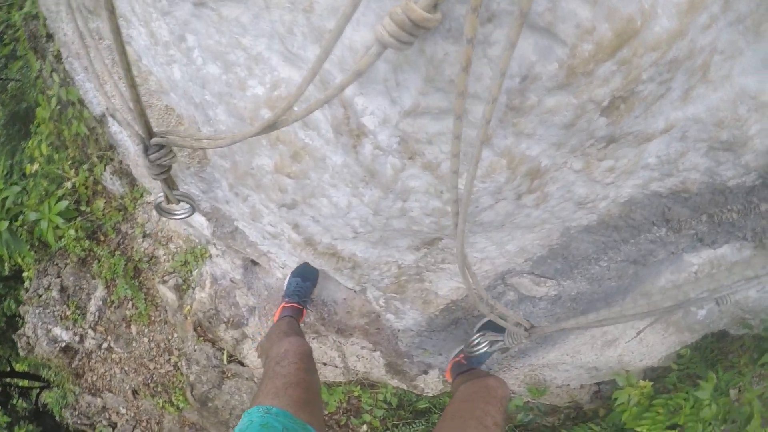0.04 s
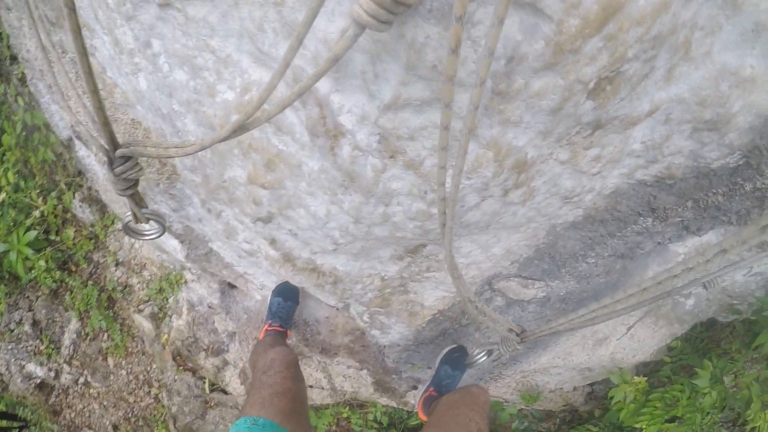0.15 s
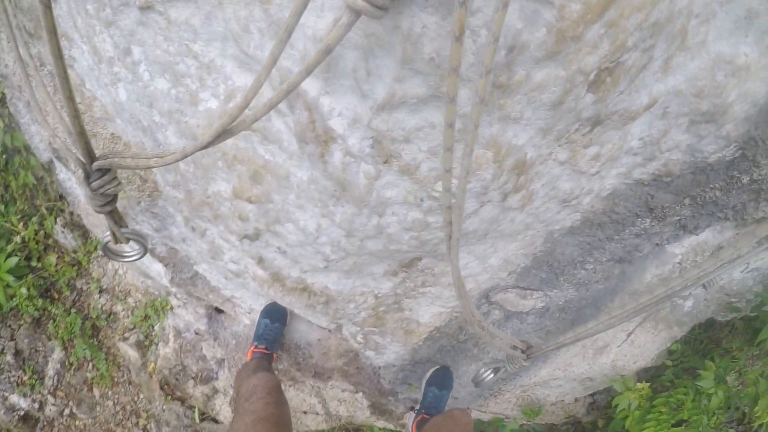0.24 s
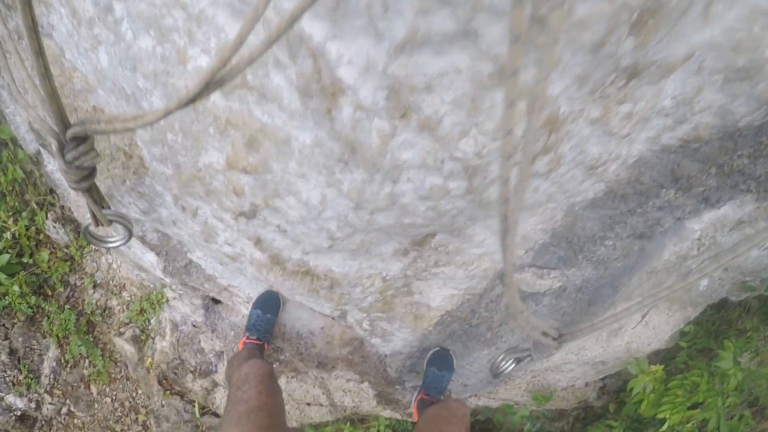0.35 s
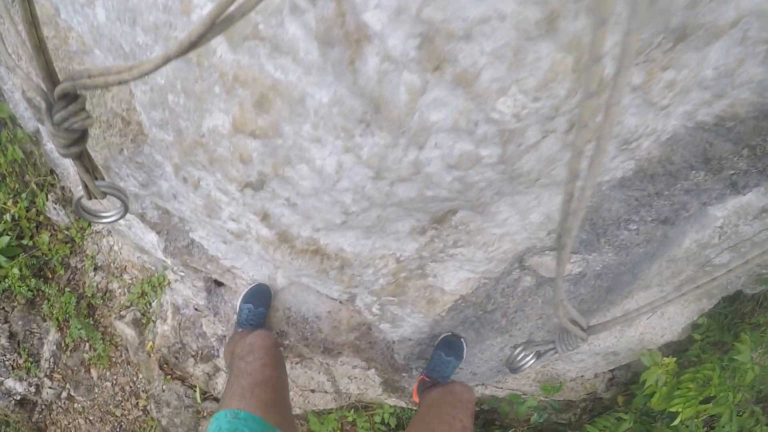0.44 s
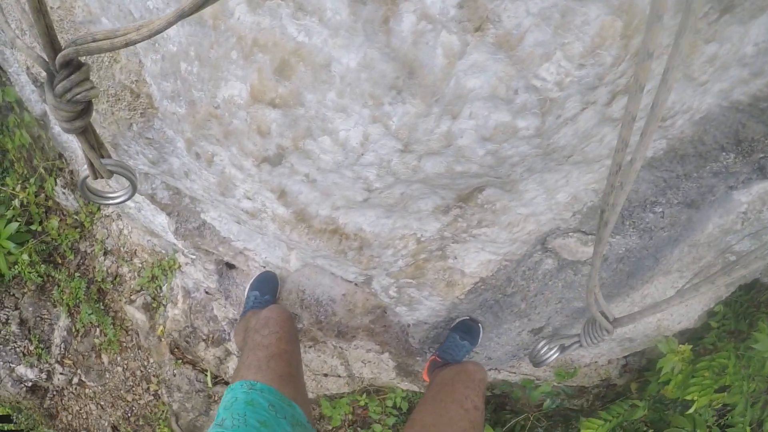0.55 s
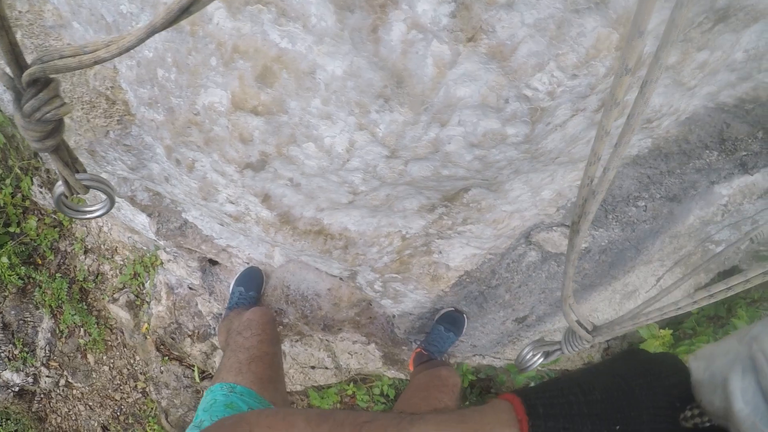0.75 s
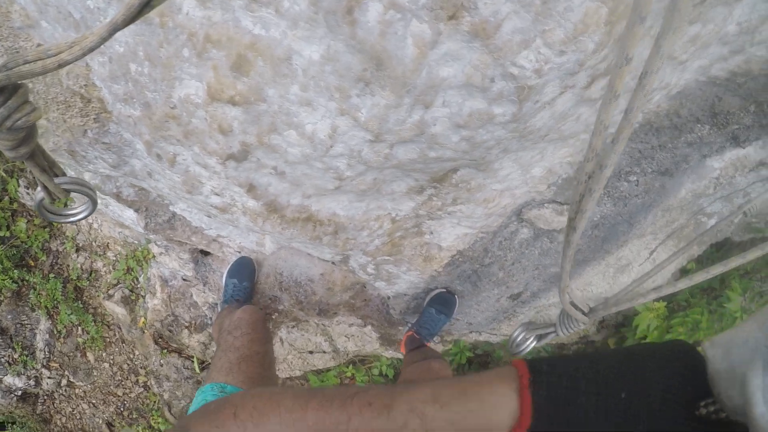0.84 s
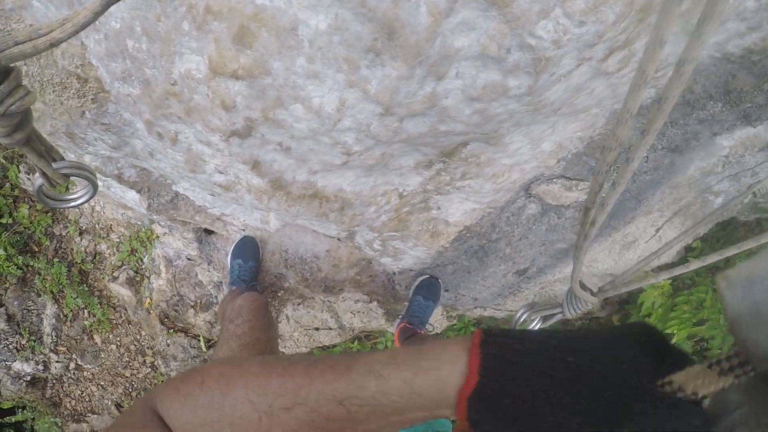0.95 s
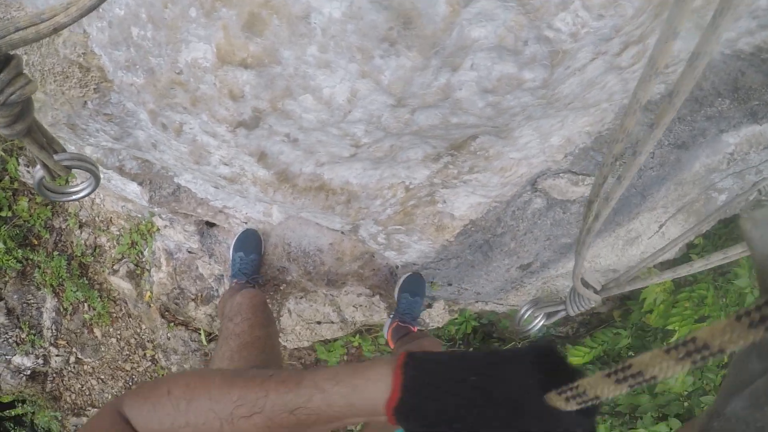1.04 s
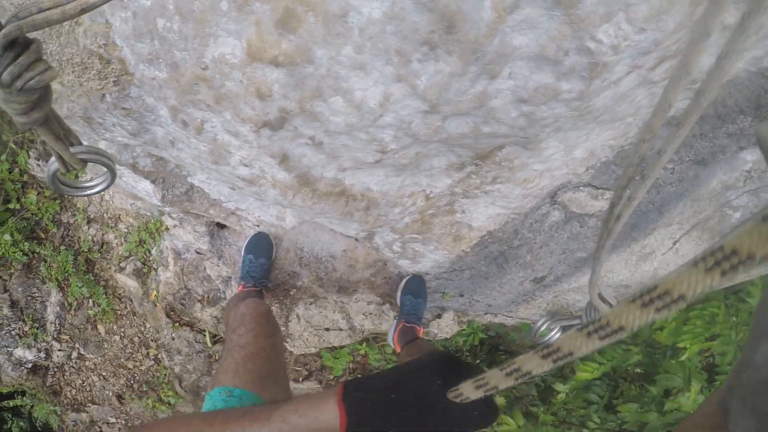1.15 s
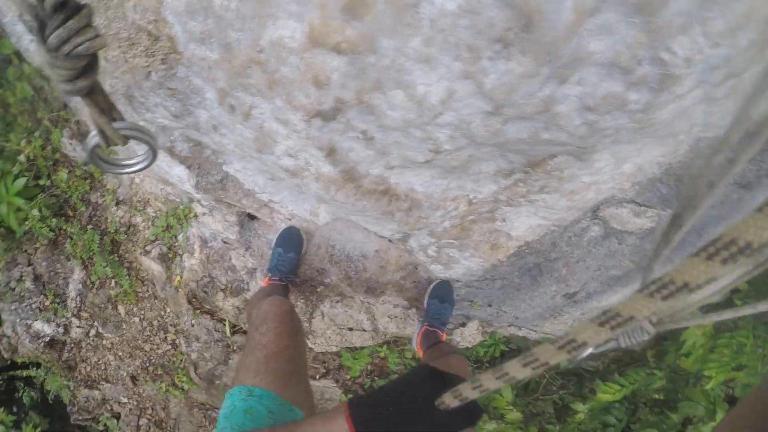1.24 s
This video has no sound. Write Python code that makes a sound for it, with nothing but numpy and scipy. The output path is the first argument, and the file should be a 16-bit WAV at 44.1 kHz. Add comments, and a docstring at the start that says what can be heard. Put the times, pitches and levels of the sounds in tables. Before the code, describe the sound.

A loaded rope knocks sharply in metal gear on an outdoor cliff, heard close on the body. A faint clink at 0.1 s leads to a rapid, growing rattle at 0.2-0.23 s, ending in a loud boomy crack. Much quieter grainy rope rubbing follows until 0.85 s, with a soft bump near 0.6 and a brighter zip peaking around 0.75. Then faint hiss, light wind, low pulsing and a tiny bump at 1.04.

```python
"""On a cliff, an abseiler is heard from a body-worn camera: a carabiner clinks as damped steel modes.
The loaded rope slips in a rattle of growing jerks: sharp contacts and noise bursts, with ringing metal
and a booming mount. It then runs out as modulated friction noise, with a zip of gliding harmonics that
rises and falls, and stops. Beneath lie outdoor hiss and a little wind on the microphone, both shaped
noise, and a faint, regular low pulsing of short sine blips."""
import sys
import numpy as np
from scipy.fft import rfft, irfft, next_fast_len
from scipy.io import wavfile
from scipy.ndimage import map_coordinates

SR = 44100
rng = np.random.default_rng(int(sys.argv[2]) if len(sys.argv) > 2 else 0)


def pcm_store(signal):
    """Save signal as 16-bit PCM."""
    levels = np.round(np.clip(np.atleast_2d(signal), -1, 1) * 32767)
    wavfile.write(sys.argv[1], SR, levels.astype(np.int16).T)


N = 57330
T = np.arange(N) / SR  # time of each sample [s]


def amp(db):
    """Level: decibels to amplitude gain."""
    return 10 ** (np.asarray(db) / 20)


def unit(x):
    """Normalization: scale to rms 1."""
    return x / np.sqrt(np.mean(x ** 2) + 1e-20)


def along(points, hz):
    """Spectral interpolation: (Hz, value) points on a log-frequency axis."""
    f, v = np.transpose(points)
    return np.interp(np.log(hz + 1), np.log(f + 1), v)


def curve(rows):
    """Linear interpolation: (s, value) points to one value per sample."""
    return np.interp(T, *np.transpose(rows))


def wobble(rate):
    """Band-limited fluctuation: a smooth curve through random knots, rate of them a second."""
    knots = rng.standard_normal(int(N * rate / SR) + 4)
    return map_coordinates(knots, [T * rate])


def filtered(x, response):
    """Linear filtering: the spectrum is multiplied by a response of frequency."""
    m = next_fast_len(N + 8192)
    gain = response(np.fft.rfftfreq(m, 1 / SR))
    return irfft(rfft(x, m) * gain, m)[..., :N]


def coloured(x, spectrum):
    """Spectral shaping by (Hz, dB) points."""
    return filtered(x, lambda hz: amp(along(spectrum, hz)))


def noise(spectrum):
    """Random excitation: Gaussian noise shaped by a spectrum, of rms 1."""
    return unit(coloured(rng.standard_normal(N), spectrum))


def ring(modes, start, attack):
    """Modal vibration: a sum of exponentially damped sines set going at start."""
    t = np.maximum(T - start, 0)
    onset = 1 - np.exp(-t / attack)
    return onset * sum(amp(db - 60 * t / t60) * np.sin(2 * np.pi * hz * t) for hz, db, t60 in modes)


def burst(start, rise, t60):
    """Exponential growth and decay: up by 60 dB over rise until start, then down by 60 dB over t60."""
    return amp(-60 * np.maximum((start - T) / rise, (T - start) / t60))


def click(start, spectrum):
    """Impulse response: one sharp contact, shaped by a spectrum and scaled to peak 1."""
    impulse = 1. * (np.arange(N) == round(start * SR))
    pulse = coloured(impulse, spectrum)
    return pulse / pulse.max()


# outdoor hiss: (frequency [Hz], level [dB]) and (time [s], level [dB])
AIR_SPECTRUM = [(60, -22), (110, -21), (160, -3), (280, -10), (420, -10.5), (1000, -14), (2760, -16),
                (6400, -18), (7400, -27), (9500, -29), (12000, -39.5), (15000, -44)]
AIR_LEVEL = [(0, -45.5), (.17, -45), (.9, -45), (1.05, -45), (1.3, -43.5)]
# highest hiss: (frequency [Hz], level [dB]) and (time [s], level [dB])
FIZZ_SPECTRUM = [(6000, -38), (9000, 3), (11500, -3), (15000, -7)]
FIZZ_LEVEL = [(0, -67), (.17, -64), (.5, -77), (.78, -58), (.9, -74), (1.3, -60.5)]


def air():
    """Broadband noise: outdoor hiss whose top end slowly comes and goes."""
    hiss = noise(AIR_SPECTRUM) * amp(curve(AIR_LEVEL))
    fizz = noise(FIZZ_SPECTRUM) * amp(curve(FIZZ_LEVEL))
    return hiss + fizz


# wind on the microphone: (frequency [Hz], level [dB]) and (time [s], level [dB])
WIND_SPECTRUM = [(10, -8), (30, 7), (60, 0.5), (100, -23), (600, -82)]
WIND_LEVEL = [(0, -52.5), (.19, -51.5), (.35, -55), (.58, -55), (.78, -55), (.85, -48.5), (.93, -55),
              (1.03, -53), (1.3, -55)]


def wind():
    """Low-frequency noise: wind on the microphone, as a rumble of varying level."""
    return noise(WIND_SPECTRUM) * amp(curve(WIND_LEVEL))


PULSE_FIRST_S, PULSE_GAP_S, PULSE_WIDTH_S = 0.0178, .1024, .0042
PULSE_HZ, PULSE_DB = 171, -37.5


def pulsing():
    """Periodic tone pulses: a faint low blip under a Gaussian envelope, about ten times a second."""
    # time from the nearest blip
    t = (T - PULSE_FIRST_S + PULSE_GAP_S / 2) % PULSE_GAP_S - PULSE_GAP_S / 2
    return amp(PULSE_DB) * np.exp(-(t / PULSE_WIDTH_S) ** 2) * np.cos(2 * np.pi * PULSE_HZ * t)


# modes of the camera mount: (frequency [Hz], relative level [dB], t60 [s])
MOUNT_MODES = [(161.5, 0, 0.041), (221, -6, 0.013), (403, -20, 0.039), (608, -19.5, 0.042)]
# the harness shaking after a thud: (frequency [Hz], level [dB])
SHUDDER_SPECTRUM = [(80, -34), (140, 0.5), (270, -7.5), (400, -24), (1000, -47)]
THUD_LEAD_S, THUD_ATTACK_S, THUD_LOW_HZ = 0.00096, 0.00051, 119.5
SHUDDER_DB, SHUDDER_RISE_S, SHUDDER_T60_S = -28, 0.0077, 0.29


def thud(start, db):
    """Structure-borne resonance: the camera mount booms and the harness shakes after it."""
    boom = ring(MOUNT_MODES, start - THUD_LEAD_S, THUD_ATTACK_S)
    shudder = noise(SHUDDER_SPECTRUM) * burst(start, SHUDDER_RISE_S, SHUDDER_T60_S)
    shaken = boom + amp(SHUDDER_DB) * shudder
    return amp(db) * filtered(shaken, lambda hz: 1 - 1 / (1 + (hz / THUD_LOW_HZ) ** 10))  # high-pass


# soft low knocks, two of them on the beat of the low pulsing: (time [s], thud level [dB], dull tap level [dB])
BUMPS = [(.0178, -52, -34.5), (0.6087, -24, -35), (1.041, -41, -37)]
# dull tap: (frequency [Hz], level [dB])
TAP_SPECTRUM = [(100, -23), (600, 1), (1400, -32), (4000, -47)]


def bumps():
    """Soft impact: a dull tap with a low boom behind it."""
    return sum(thud(s, thud_db) + amp(tap_db) * click(s, TAP_SPECTRUM) for s, thud_db, tap_db in BUMPS)


# steel carabiner: (frequency [Hz], level [dB], t60 [s])
STEEL_MODES = [(3200, -46, 0.17), (8870, -39, 0.063), (9010, -44.5, 0.075)]


def clink():
    """Free vibration: the carabiner's lightly damped steel modes ring."""
    return ring(STEEL_MODES, start=.107, attack=.003)


# jerks of the rope in the descender: (time [s], crack level [dB], thud level [dB],
# bright snap level before a 9 dB cut [dB], metal ring level [dB], crack dull above [Hz])
JERKS = [(.1972, -23, -58, -65, -53, 3200), (0.2076, -11.5, -53, -43, -43, 4500),
         (.2183, -2, -27, -31, -32, 4800), (.2245, -10, -25, -55, -27.5, 1400),
         (.2295, -2.5, -3.5, -13.5, -24, 3020), (.2333, -13, -22, -23, -26.5, 2000)]
# sharp crack: (frequency [Hz], level [dB])
CRACK_SPECTRUM = [(70, -5), (200, -9.5), (410, 6.5), (500, 1), (630, 4.5), (720, -2.5), (930, 2.5),
                  (1700, 1.5), (1950, -1), (2400, 0), (3100, -10), (3900, -16.5), (5600, -21), (7500, -41)]
# metallic snap: (frequency [Hz], level [dB])
SNAP_SPECTRUM = [(2000, -29), (3600, 0), (4800, -10), (6000, 11), (7400, -33), (9000, 0.5), (11500, -10),
                 (12500, 9), (14200, -6), (15700, -8)]
# descender: (frequency [Hz], relative level [dB], t60 [s])
DESCENDER_MODES = [(1720, -5, 0.026), (2424, -2, 0.036), (3284, 2, .06), (5930, -3, 0.022),
                   (6490, -12.5, 0.036)]
SCRAPE_DB, SCRAPE_RISE_S, SCRAPE_T60_S = -10, .016, .014  # rough contact, relative to its crack
SNAP_RISE_S, SNAP_T60_S = 0.0019, 0.0075


def knocks():
    """Stick-slip: each jerk is a scraping crack and a snap that ring the descender and thud the mount."""
    out = np.zeros(N)
    for s, crack_db, thud_db, snap_db, ring_db, top_hz in JERKS:
        scrape = amp(SCRAPE_DB) * noise(CRACK_SPECTRUM) * burst(s, SCRAPE_RISE_S, SCRAPE_T60_S)
        crack = click(s, CRACK_SPECTRUM) + scrape
        out += amp(crack_db) * filtered(crack, lambda hz: 1 / np.sqrt(1 + (hz / top_hz) ** 4))  # low-pass
        out += amp(snap_db - 9) * noise(SNAP_SPECTRUM) * burst(s, SNAP_RISE_S, SNAP_T60_S)
        out += amp(ring_db) * ring(DESCENDER_MODES, s, THUD_ATTACK_S)
        out += thud(s, thud_db)
    return out


SQUEAK_WIDTH_HZ, SQUEAK_FADE_S = 300, 0.015  # the width is the knot rate of the band's modulation


def squeak(track):
    """Narrow-band friction noise: random modulation of a carrier that glides along its track."""
    s, hz, db = np.transpose(track)
    carrier = np.exp(2j * np.pi * np.cumsum(np.interp(T, s, hz)) / SR)
    band = (wobble(SQUEAK_WIDTH_HZ) + 1j * wobble(SQUEAK_WIDTH_HZ)) * carrier
    fade = np.clip(1 + np.minimum(T - s[0], s[-1] - T) / SQUEAK_FADE_S, 0, 1)
    return unit(band.real) * fade * amp(np.interp(T, s, db))


# passing rate of the sheath's weave, levels relative to the rub:
# (time [s], rate [Hz], fundamental level [dB], octave level [dB])
WEAVE = [(.26, 400, -12, -23), (.335, 352, -15.5, -27), (0.421, 362, -8, -30), (.472, 394.5, -12, -22),
         (.513, 492.8, -12, -22), (.54, 428, -27, -14.5), (0.576, 465, -28, -7.5), (.612, 490, -24, -14),
         (.66, 480, -28, -38), (.70, 500, -14.5, -14), (.745, 552, -7, -4), (.787, 472, -19, -5),
         (.825, 388.5, -23.5, -7.5)]
ZIP_JITTER, ZIP_FLUTTER_DB = .018, 2.6  # random depth: share of the rate; level
THIRD_DB = -4.5  # third multiple against the octave


def zip_tone():
    """Periodic excitation: the passing weave sings in harmonics, its octave taking over at times."""
    s, hz, low_db, octave_db = np.transpose(WEAVE)
    rate = np.interp(T, s, hz) * (1 + ZIP_JITTER * wobble(220))
    phase = 2 * np.pi * np.cumsum(rate) / SR
    out = np.zeros(N)
    for k, db in enumerate([low_db, octave_db, octave_db + THIRD_DB], 1):
        fluttering = np.sin(k * phase) * amp(ZIP_FLUTTER_DB * wobble(67.73))
        out += amp(np.interp(T, s, db)) * unit(fluttering)
    return out


# rub while the rope gathers speed: (frequency [Hz], level [dB])
EARLY_SPECTRUM = [(150, -28), (260, -13), (360, -5.5), (500, -3), (650, -9.5), (900, -4), (1300, -8),
                  (1750, -7.5), (1930, -21), (2130, -9), (2950, -8.5), (3350, -18), (6400, -24.5),
                  (7300, -36), (10300, -30.5), (15000, -47)]
# rub of the running rope: (frequency [Hz], level [dB])
LATE_SPECTRUM = [(150, -12.5), (430, -21), (700, -4.5), (1100, -6.5), (1380, -9.5), (1600, -3.5),
                 (2800, -6), (4000, -9.5), (5800, -14), (7400, -28), (12300, -34.5), (15000, -48)]
# overall friction level: (time [s], level [dB])
RUB_LEVEL = [(0.245, -41), (0.251, -37), (0.533, -37.5), (0.599, -36.5), (0.673, -37.5), (0.743, -36.5),
             (0.827, -38), (0.853, -60), (0.87, -53)]
# hoarse squeaks, one track each, relative to the rub: (time [s], centre frequency [Hz], level [dB])
SQUEAKS = [
    [(.53, 1180, -18), (.57, 1244, -5), (.61, 1143, -5), (.655, 1160, -11.5)],
    [(.70, 1750, -22), (.75, 1870, -3), (.785, 1862, -21)],
    [(.765, 810, -13), (.79, 798, -12), (.825, 786, -7)],
    [(.51, 2328, -14), (.62, 2315, -8), (.69, 2316, -9)],
    [(.64, 2817, -12), (.715, 2895, -7), (.82, 2470, -11)],
]
# crackle of the running sheath: (frequency [Hz], level [dB])
FIBRE_SPECTRUM = [(1500, -19), (3500, 7), (6200, -3), (15000, -37)]
# fibres catching as the rope runs: (time [s], level [dB])
CATCHES = [(.3065, -23), (.4812, -24), (.5668, -39), (.7475, -39)]
RUB_START_S, RUB_END_S, RUB_FADE_S = 0.238, .85, 0.01
BRIGHTEN_S, BRIGHTEN_LENGTH_S = 0.56, 0.1  # middle and length of the crossfade
RUB_DB, GRAIN_DB = -1.5, 1.8  # grainy part before the overall level; random depth of its grain
FIBRE_DB, FIBRE_SPREAD_DB = -16, 5  # crackle before the overall level; its random depth


def rope():
    """Sliding friction: grainy noise that changes colour, with squeaks, crackle, catches and the zip."""
    late = np.clip(.5 + (T - BRIGHTEN_S) / BRIGHTEN_LENGTH_S, 0, 1)
    rub = np.sqrt(1 - late) * noise(EARLY_SPECTRUM) + np.sqrt(late) * noise(LATE_SPECTRUM)
    friction = amp(RUB_DB) * unit(rub * amp(GRAIN_DB * wobble(350)))
    friction += sum(squeak(track) for track in SQUEAKS) + zip_tone()
    crackle = unit(noise(FIBRE_SPECTRUM) * amp(FIBRE_SPREAD_DB * wobble(700)))
    friction += amp(FIBRE_DB) * late * crackle
    gate = np.clip(np.minimum(T - RUB_START_S, RUB_END_S - T) / RUB_FADE_S, 0, 1)
    catches = sum(amp(db) * click(s, CRACK_SPECTRUM) for s, db in CATCHES)
    return friction * gate * amp(curve(RUB_LEVEL)) + catches


# stereo spread of the hiss: (frequency [Hz], side level [dB])
WIDTH = [(2000, -70), (4800, -45), (9500, -42), (11000, -22), (13000, 1.5)]
# stereo lean of the gear: (frequency [Hz], share towards the right)
LEAN = [(9000, 0), (12500, 0.53)]


def scene():
    """Mid-side superposition: near mono but for the high treble, where hiss spreads and gear leans right."""
    gear = knocks() + bumps() + clink()
    mid = gear + rope() + air() + pulsing() + wind()
    side = coloured(air(), WIDTH) - filtered(gear, lambda hz: along(LEAN, hz))
    return np.array([mid + side, mid - side])


CEILING, TOP_HZ = .85, 15600  # peak amplitude before band limiting; band limit


def record(dry):
    """Saturation and band limiting: the highest peaks are softly rounded, and the camera cuts the treble from
    its limit up."""
    rounded = dry / (1 + (dry / CEILING) ** 10) ** (1 / 10)
    return filtered(rounded, lambda hz: hz < TOP_HZ)


dry = scene()
out = record(dry)
pcm_store(out)
```